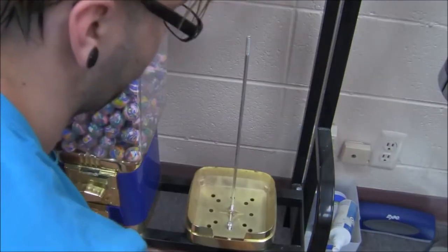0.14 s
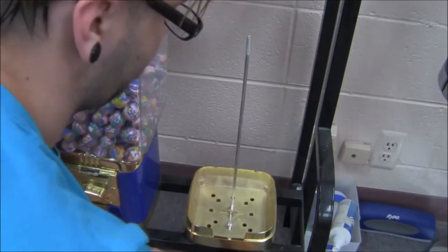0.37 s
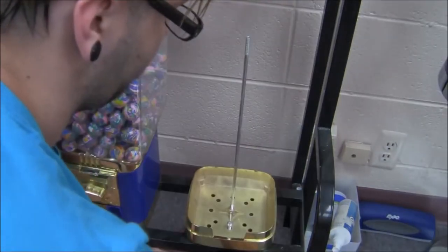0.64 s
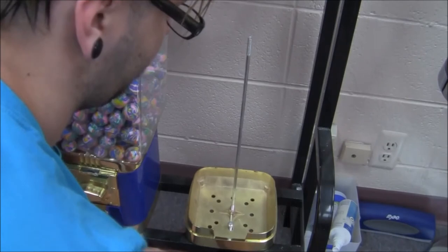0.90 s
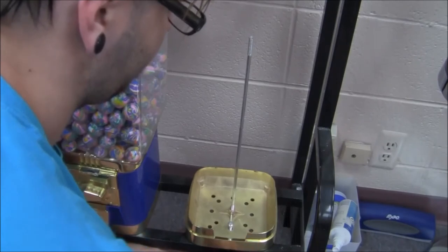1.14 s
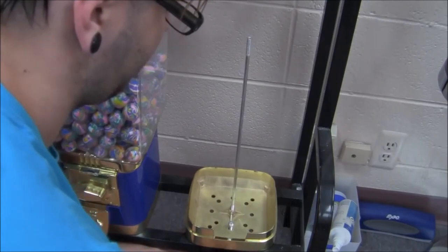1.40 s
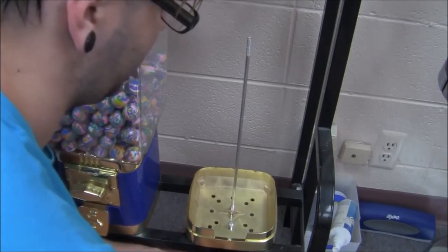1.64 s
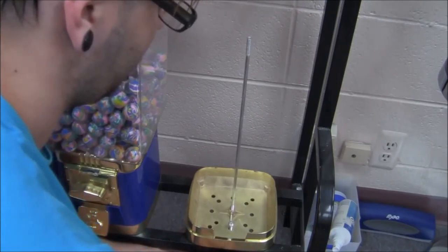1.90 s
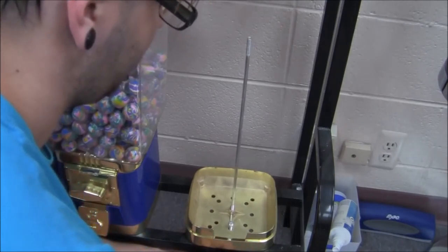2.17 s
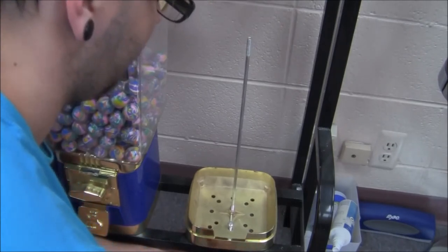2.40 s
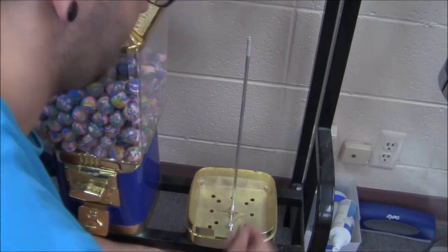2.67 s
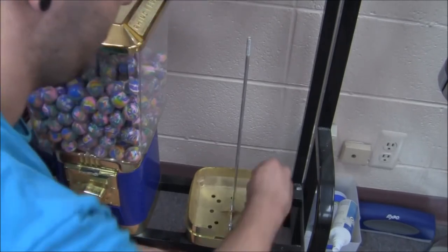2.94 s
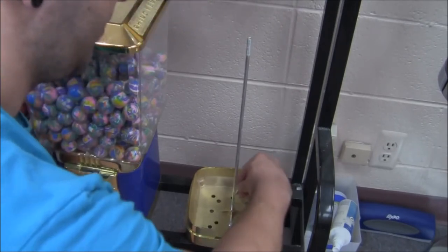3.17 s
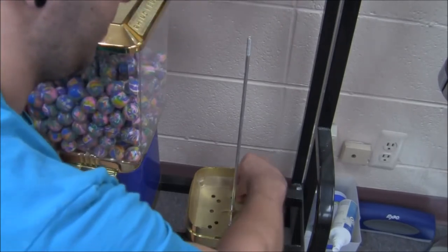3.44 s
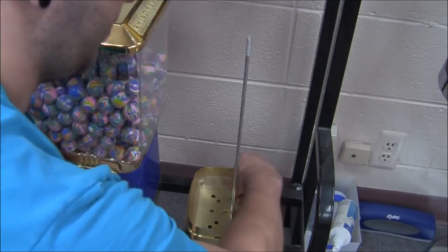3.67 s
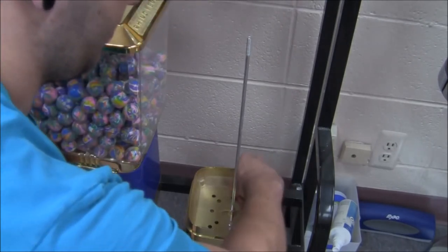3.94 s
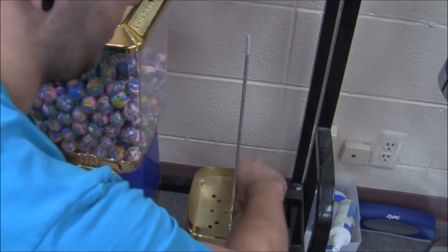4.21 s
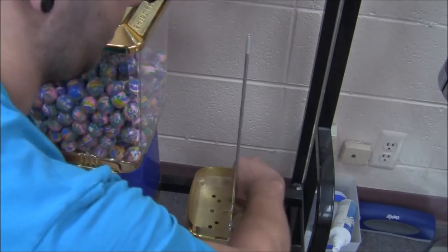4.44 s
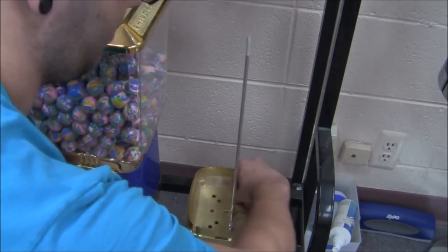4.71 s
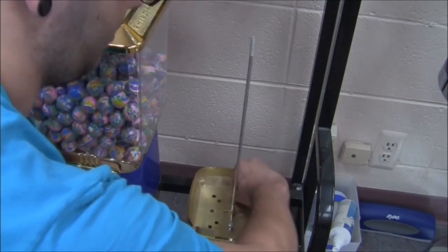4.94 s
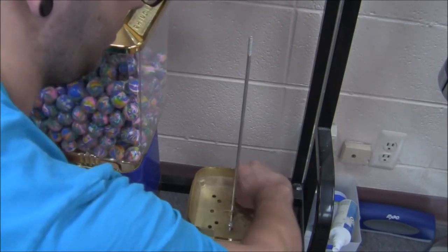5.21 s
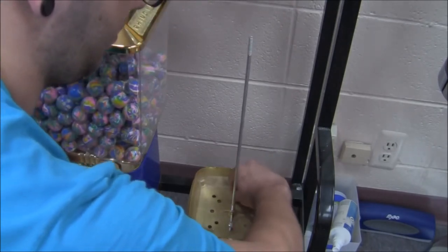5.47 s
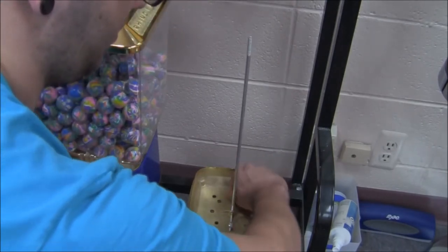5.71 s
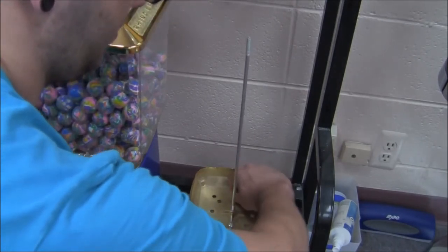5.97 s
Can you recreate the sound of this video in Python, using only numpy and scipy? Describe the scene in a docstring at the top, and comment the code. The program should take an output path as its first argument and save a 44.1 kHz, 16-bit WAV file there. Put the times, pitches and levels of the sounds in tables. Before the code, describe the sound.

Small steel parts are worked by hand in a metal casting on a shelf. First come several separate ringing clanks with low bumps, then about a second and a half of near quiet with one faint tap. After that, quick crisp clicks lead into smaller rattles, thuds and short gritty scrapes, thinning out at the end. The microphone is close, the indoor echo short and dry, with a faint throb in the background at times.

```python
"""Quiet room tone and a faint throb come first; then small steel bolts knock in a cast metal base on a shelf.
Place: a quiet room, its answer sparse echoes that die at a separate speed in each band.
Hands: bolts are dropped in and turned; chatter drives metal modes, fingers drag on the casting and thump the shelf.
Distance: the direct sound outweighs the room. Microphone: two channels, mostly leaning right, with treble loss."""
import sys
import numpy as np
from scipy import signal
from scipy.fft import rfft, irfft, next_fast_len
from scipy.io import wavfile
from scipy.ndimage import uniform_filter1d

SR = 44100
rng = np.random.default_rng(int(sys.argv[2]) if len(sys.argv) > 2 else 0)


def undo_db(level):
    """Turn decibels back into plain size, where 20 dB means ten times bigger."""
    steps = np.asarray(level, float) / 20
    return 10 ** steps


def store_pcm(level_fs):
    """Save levels as 16-bit WAV."""
    pcm = np.round(np.clip(level_fs, -1, 1) * 32767).astype(np.int16)
    wavfile.write(sys.argv[1], SR, np.atleast_2d(pcm).T)


N = 269010  # samples

# Room tone spectrum, relative: pitch_hz, level_db (per Hz)
AIR_SPECTRUM = [(12, -29.5), (20, -16.5), (197, -5), (220, -6.5), (344, -5), (395, -11.5), (552, -7.5),
                (600, -12.5), (730, -13), (964, -13), (1110, -15.5), (1390, -16.5), (1550, -19),
                (1730, -19.5), (15700, -38)]
AIR_DB = -59.5  # rms over both channels
# Left-right likeness of the room tone: pitch_hz, likeness (-1 to 1)
AIR_LIKENESS = [(60, 0.8353), (180, 0.4364), (550, -0.1591), (1650, -0.1335), (4970, 0.5009),
                (15000, -0.2045)]
# Spans in which the throb is heard: start_s, level_db (relative)
THROB_SPANS = [
    [(0.0, -64), (0.2, -68)],
    [(4.1, -65.5), (4.3, -71)],
    [(5.15, -71), (5.426, -84.5), (5.576, -72.5), (5.678, -66.5), (6.1, -65.5)],
]
THROB_HZ, THROB_WIDTH_HZ, THROBS_PER_S = 1686.4, 260, 21
# Decay of the room by band: pitch_hz, t60_s
ROOM_DECAY = [(300, 0.2244), (1000, 0.17483), (3000, 0.21902), (8000, 0.22027), (12000, 0.1087)]

# Fingers push the base: start_s, shelf_level_db, drag_db (against the shelf), thump_t60_s
PUSHES = [(0.158, -41.5, -3.5, 0.3515), (0.408, -46, -2.5, 0.2704), (0.561, -48, -15, 0.25),
          (.660, -37.5, -10, 0.3265), (0.72, -45.5, -6, 0.4924), (0.871, -46, -22, 0.4007),
          (1.057, -51, -11.5, 0.4294), (1.145, -52.5, -8, 0.4039), (1.377, -41, -2, 0.2396),
          (2.402, -57.5, -4.5, 0.3953), (2.73, -64, -5, 1.0637), (2.861, -54.5, -6.5, 0.325),
          (3.014, -60, 11, 0.0013), (3.391, -45, -5.5, 0.4846), (3.452, -45.5, -4, 0.4067),
          (3.642, -47, -6.5, 0.5847), (3.785, -58.5, -1, 0.5943), (3.926, -45, -12.5, 0.4348),
          (4.003, -44, -7, 0.2553), (4.05, -39, -9.5, 0.2526), (4.141, -56, -16, 0.452),
          (4.302, -53, -9, 0.5595), (4.365, -49, -7.5, 0.7778), (4.531, -45.5, -11.5, 0.2559),
          (4.699, -47, -8.5, 0.8277), (4.83, -46, -22, 0.2726), (4.97, -40.5, -8, 0.3352),
          (5.02, -48, -6.5, 0.3522), (5.119, -55, -3, 0.7877), (5.378, -56, 0, .5),
          (5.501, -43, -8.5, 0.2497), (5.62, -58.5, -5, 0.7747), (5.852, -63, -15.5, 0.126),
          (5.96, -62, -9.5, 0.3054), (6.07, -65.5, 1, 0.1)]
PUSH_RISE_S, PUSH_BEND = 0.003994, 1.2689  # the fade starts slowly and steepens
DRAG_LINGERS = 1.1042  # the drag lasts this many times the thump
JOLT_DB = 9  # first contact of a push, against one bump
# Resonances of the shelf: pitch_hz, width_hz, level_db
SHELF_BODY = [(173.88, 64.6, -15), (216.75, 52.76, -10), (289.64, 35.8, -5), (330.62, 23.426, -2),
              (368.52, 27.89, 0.5), (432.58, 21.504, -1.5), (489.24, 36.976, -2.5), (605.95, 70.48, -5.5),
              (696.23, 84.13, -9), (927.35, 197.6, -12.5)]
# Resonances of the casting under dragging fingers: pitch_hz, width_hz, level_db
DRAG_BODY = [(917.1, 201.4, -4.5), (1198.7, 160.72, 1), (1607.3, 198.1, -0.5), (1864.8, 226.9, -5),
             (2315.8, 85, -7.5), (3380, 4535, -17)]

# One part rings on alone: start_s, peak_db, pitch_hz, t60_s
PINGS = [(0.158, -35.5, 2829, 0.3736), (.159, -48, 4535, 0.3306), (.41, -58, 5522, 0.3329),
         (0.416, -47, 1716, 0.4888), (0.421, -42, 2840, 0.217), (.665, -39, 372.5, 0.3068),
         (.722, -38.5, 372.5, 0.3121), (1.149, -52.5, 1737, 0.2616), (1.38, -43, 4535, 0.2644),
         (1.38, -47, 3183, 0.6461), (2.87, -50, 1734, 0.4407), (3.4345, -23.5, 9830, 0.0468),
         (3.448, -39, 1740, 0.2673), (3.608, -25, 7033, 0.01358), (3.952, -48, 2861, 0.1389),
         (4.065, -42.5, 422.3, 0.2342), (4.305, -59.5, 8051, 0.2752), (4.31, -45.5, 3380, 0.11335),
         (5.40, -49.5, 1700, 0.247), (5.888, -53.5, 3198, 0.2643), (6.065, -62.5, 6430, 0.36)]
# Knocks at the source: start_s, peak_db (near 2 kHz),
# then against it low_db (around 1.1 kHz), mid_db (around 4 kHz), high_db (around 8 kHz)
KNOCKS = [(0.1587, -26, -1, 4.5, -7), (0.4072, -29, 2, -9, -16), (0.4134, -42.5, 4.5, -8.5, -31),
          (0.5596, -47.5, -27, -11, -25.5), (0.6581, -24, -16, -17.5, -25.5),
          (0.6633, -24.5, -18.5, -8.5, -27.5), (0.7171, -27, 0.5, -7, -15), (0.771, -54.5, -7, -23, -30),
          (0.8679, -55, -8.5, -51, -41), (1.1424, -39.5, -4, -16, -19), (1.1514, -47.5, 9.5, -23, -5),
          (1.3792, -17.5, -9, -0.5, -15), (2.4034, -54.5, 6.5, -1.5, -2), (2.863, -45, 3.5, -29.5, -36.5),
          (3.385, -27, -23.5, -3.5, -15.5), (3.4168, -33, -28, 1, -3.5), (3.4373, -19, -38.5, 0, -4.5),
          (3.4468, -21, -23, 6, -0.5), (3.5949, -37, -29, -5, -9), (3.6074, -42.5, -7.5, -0.5, 2.5),
          (3.6564, -40, -12, -10, -15.5), (3.706, -44, -13.5, -7.5, -28.5), (3.7816, -36, -10.5, 6.5, 9.5),
          (3.921, -46.5, -19.5, -4.5, -5), (3.9513, -41, -5.5, -9, -18.5), (3.9977, -47, -5, -10.5, -9.5),
          (4.0527, -39, -1, -12, -15), (4.3032, -34, -7, 0, -10.5), (4.3773, -36.5, -25.5, -5.5, -18.5),
          (4.4109, -46.5, -26, -20, -19.5), (4.6936, -46, -6, -10.5, -9.5), (4.7166, -33, -10.5, 1, -7),
          (4.7644, -32.5, -9, -9.5, -33), (4.9701, -41.5, -32.5, -3, -21.5), (4.9978, -39, -19, -5, -9),
          (5.3931, -42, -9.5, -5.5, -15), (5.5059, -50, 10.5, -4, -8.5), (5.887, -42.5, -12, -8, -3)]
# Short casting resonances: pitch_hz, width_hz, level_db
CLACK_BODY = [(1160, 160, 2), (1550, 200, -11), (1950, 100, 2), (2150, 90, 1), (2600, 200, -4),
              (2820, 200, -4), (3200, 120, -9), (3620, 150, -8), (4180, 120, -5), (4550, 220, -2),
              (5050, 250, -7), (6430, 350, -8), (7200, 300, -11), (7980, 250, -11), (8900, 400, -16),
              (9850, 350, -9), (10400, 300, -13)]
# Long modes of the free casting: pitch_hz, level_db, t60_s
FREE_MODES = [(1061, -8, 0.26), (1227, -11, 0.27), (1378, -3, 0.13), (1733, -11, 0.24), (1949, -15, 0.26),
              (2116, -12, 0.25), (2460, -19, 0.26), (2740, -11, 0.27), (2837, -1, 0.27), (3182, -2, 0.23),
              (3650, -14, 0.26), (3892, 0, 0.14), (4156, -10, 0.18), (4398, -9, 0.17), (4533, -7, 0.23),
              (4834, -13, 0.24), (5055, -21, 0.29), (6352, -16, 0.13), (6595, -33, 0.37), (7300, -15, 0.13),
              (7720, -31, 0.31), (8027, -29, 0.25), (9733, -23, 0.13), (9921, -15, 0.092)]
# Modes of bolt and casting under the hand: pitch_hz, level_db, t60_s
HELD_MODES = [(1733, -16, .25), (1879, -13, .15), (2159, -8, .1), (2630, -14, .1), (2837, -11, .14),
              (3203, -17, .2), (3451, -20, .2), (3903, -23, .2), (4172, -9, .13), (4452, -17, .14),
              (4764, -14, .088), (4947, -5, .053), (5238, -15, .16), (5367, -17, .2), (6078, -18, .18),
              (6438, -4, .054), (7138, -20, .15), (7590, -17, .11), (7962, -15, .1), (8199, -28, .2),
              (8527, -26, .2), (8791, -25, .14), (9250, -22, .12), (9512, -25, .12), (9959, -14, .075),
              (10150, -15, .1), (10560, -20, .12), (11530, -36, .15)]
HAND_ON_S = 3.2  # from here a hand rests in the base
FREE_RING_DB, HELD_RING_DB = -12.5, -13  # long modes against the clack, before the spot's favour
# Many weak modes between the listed ones, as a dying hiss; level before the treble is softened
RATTLE_DB, RATTLE_T60_S = -15.5, 0.1588

# A bolt slides on the casting: start_s, peak_db (at the source), mid_db (around 4 kHz), stroke_s
SCRAPES = [(3.941, -49.5, 13, 0.02383), (4.048, -53.5, -10.5, 0.0923), (4.5, -48.5, -10, 0.03821),
           (4.541, -44, -12, 0.02799), (4.9445, -54, -9, 0.02346), (4.98, -47.5, -6.5, 0.01272),
           (5.106, -51, -19, 0.01375), (5.666, -54.5, -11.5, 0.03888), (5.907, -43, -12.5, 0.016786),
           (6.056, -48.5, -12.5, 0.04027)]

# Lean of the work between the channels: pitch_hz, left_minus_right_db
LEAN = [(150, 2), (350, -4.5), (700, -4.5), (1500, -2), (5000, -2), (10000, 0.5)]
# Treble loss on the way to the microphone: pitch_hz, level_db
MIC_LOSS = [(9500, -1.5), (10600, -3.5), (11500, -7), (13500, -16), (16000, -83.5)]


def evened(x):
    """Scales to rms 1."""
    return x / np.sqrt(np.mean(x ** 2) + 1e-20)


def read(points, hz):
    """Reads a table along log frequency."""
    f, value = np.transpose(points)
    return np.interp(np.log(hz + 1), np.log(f + 1), value)


def add(mix, s, sound):
    """Mixes a sound in at a time."""
    part = mix[round(s * SR):][:len(sound)]
    part += sound[:len(part)]


def body(peaks, hz, spot_db=0):
    """Frequency response of parallel resonances; spot_db is how well the struck spot drives each."""
    f, width, db = np.transpose(peaks)[:, :, None]
    sign = (-1.) ** np.arange(len(f))[:, None]
    damping = 1j * hz * width
    return (sign * undo_db(db + spot_db) * damping / (f ** 2 - hz ** 2 + damping)).sum(axis=0)


def through(x, peaks):
    """Filters a long signal by a body."""
    size = next_fast_len(N + SR)
    return irfft(rfft(x, size) * body(peaks, np.fft.rfftfreq(size, 1 / SR)), size)[:N]


def air():
    """Room tone and microphone hiss as random short-time spectra, with slow patches of level."""
    frames, hz = N // 512 + 5, np.fft.rfftfreq(2048, 1 / SR)
    a, b, c, d, patches = rng.standard_normal((frames, 1025, 5)).T
    patches = evened(uniform_filter1d(uniform_filter1d(patches, 20, 0), 8, 1))
    likeness = np.clip(read(AIR_LIKENESS, hz), -1, 1)[:, None]
    left = a + 1j * b
    right = likeness * left + np.sqrt(1 - likeness ** 2) * (c + 1j * d)
    spectra = np.array([left, right]) * undo_db(read(AIR_SPECTRUM, hz)[:, None] + 0.6298 * patches)
    return undo_db(AIR_DB) * evened(signal.istft(spectra, nperseg=2048, noverlap=1536)[1][:, :N])


def throb_gain():
    """Gain of the throb along time, silent between its spans."""
    t, gain = np.arange(N) / SR, np.zeros(N)
    for span in THROB_SPANS:
        start_s, level_db = np.transpose(span)
        gain += undo_db(np.interp(t, start_s, level_db, left=-200, right=-200))
    return uniform_filter1d(gain, 800)


def throb():
    """Regular puffs of noise pass twice through one narrow resonance."""
    turns = np.arange(N) * THROBS_PER_S / SR + 0.2298
    puffs = rng.standard_normal(N) * np.exp(5.74 * np.cos(2 * np.pi * turns))
    narrow = [(THROB_HZ, THROB_WIDTH_HZ, 0)]
    return evened(through(through(puffs, narrow), narrow)) * throb_gain() * undo_db(-2.5)


def room(x):
    """Sparse taps of random sign, each band dying at its own speed, other taps for each side."""
    taps = np.zeros((2, SR // 2))
    at = np.arange(160, SR // 2 - 20, 20) + rng.integers(0, 20, (2, (SR // 2 - 161) // 20))
    np.put_along_axis(taps, at, rng.choice([-1., 1.], at.shape), 1)
    taps = taps + 0.5437 * taps[::-1]  # each side hears some of the other
    hz, t, spectra = signal.stft(taps, SR, nperseg=256)
    fade = undo_db(-60 * t / read(ROOM_DECAY, hz)[:, None])
    tail = signal.istft(spectra * fade, SR, nperseg=256)[1]
    return signal.fftconvolve(x[None], tail / np.linalg.norm(tail[0]), axes=1)[:, :N]


def pushing(drags):
    """Gain along time of all pushes: a quick rise, then a fade that steepens."""
    power, t = np.zeros(N), np.arange(SR) / SR
    rise = 1 - np.exp(-t / PUSH_RISE_S)
    for s, db, drag_db, t60 in PUSHES:
        length = t60 * (DRAG_LINGERS if drags else 1)
        fade_db = -60 * (t / length) ** PUSH_BEND
        add(power, s, (undo_db(db + drags * drag_db + fade_db) * rise) ** 2)
    return np.sqrt(power)


def sparse_hits(per_s, spread_db):
    """Random single-sample contacts of widely varied strength."""
    hits = (rng.random(N) < per_s / SR) * rng.standard_normal(N)
    return hits * undo_db(spread_db * rng.exponential(1, N))


def handling():
    """A jolt, then soft bumps and slips of the fingers shake the shelf and drag on the casting."""
    bumps, slips = sparse_hits(900, 1.8), sparse_hits(6000, 1.217)
    jolts = np.zeros(N)
    for s, db, *_ in PUSHES:
        add(jolts, s, undo_db(db + JOLT_DB) * np.ones(1))
    soft = signal.butter(4, 1100, fs=SR, output="sos")  # skin is soft: little treble
    slips = signal.sosfilt(signal.butter(2, 4000, fs=SR, output="sos"), slips)
    shelf = through(signal.sosfilt(soft, bumps * pushing(False) + jolts), SHELF_BODY)
    shelf = shelf / through(signal.sosfilt(soft, bumps), SHELF_BODY).std()
    drag = evened(through(slips, DRAG_BODY)) * pushing(True)
    return shelf + drag


def pings():
    """Single parts ring on alone as dying sines."""
    out, t = np.zeros(N), np.arange(SR // 3) / SR
    rise = 1 - np.exp(-t / 0.001561)
    for s, db, hz, t60 in PINGS:
        add(out, s, undo_db(db - 60 * t / t60) * np.sin(2 * np.pi * hz * t) * rise)
    return out


def struck(modes, t):
    """One row of dying sine for each mode, the sum peaking at 1."""
    f, db, t60 = np.transpose(modes)[:, :, None]
    tones = undo_db(db - 60 * t / t60) * np.sin(2 * np.pi * f * t) * (1 - np.exp(-t / 0.002408))
    return tones / abs(tones.sum(axis=0)).max()


def knocks():
    """A few ms of contact chatter drive the short resonances; the blow starts the long modes."""
    out, t, hz = np.zeros(N), np.arange(16384) / SR, np.fft.rfftfreq(16384, 1 / SR)
    free, held = struck(FREE_MODES, t), struck(HELD_MODES, t)
    for s, db, low_db, mid_db, high_db in KNOCKS:
        chatter = rng.standard_normal(len(t)) * t * np.exp(-t / 0.0021128)
        clack_spot_db = 2.5 * rng.standard_normal((len(CLACK_BODY), 1))
        clack = irfft(rfft(chatter) * body(CLACK_BODY, hz, clack_spot_db))
        rattle = rng.standard_normal(len(t)) * undo_db(RATTLE_DB - 60 * t / RATTLE_T60_S)
        rattle *= 1 - np.exp(-t / 0.001233)
        rattle = signal.lfilter([.4], [1, -.6], rattle)  # weaker towards the treble
        if s > HAND_ON_S:
            modes, ring_db, spread_db = held, HELD_RING_DB, 4
        else:
            modes, ring_db, spread_db = free, FREE_RING_DB, 1.5
        spot = undo_db(spread_db * rng.standard_normal(len(modes)))  # the struck spot favours some modes
        ring = undo_db(ring_db) * spot @ modes
        spectrum = rfft(clack / abs(clack).max() + rattle + ring)
        bands = [(800, 1450, low_db), (1450, 2550, 0), (2550, 5700, mid_db), (5700, SR, high_db)]
        for lo_hz, hi_hz, rel_db in bands:
            edge = 1 / (1 + (hz / hi_hz) ** 12) - 1 / (1 + (hz / lo_hz) ** 12)
            band = np.roll(irfft(spectrum * edge), 100)  # room for the filter's swing ahead of the onset
            add(out, s - 100 / SR, undo_db(db + rel_db) * band / abs(band).max())
    return out


def scrapes():
    """Dense micro-slips under a short stroke drive the modes of the seated bolt."""
    out = np.zeros(N)
    hz = np.fft.rfftfreq(8192, 1 / SR)
    rubbed = [(f, 10.56 / t60, 0) for f, _, t60 in HELD_MODES]  # rubbing widens every mode
    for s, db, mid_db, length in SCRAPES:
        u = np.arange(8192) / SR / max(length, .005)
        stroke = u ** .5 * np.exp(-u ** 2)
        slips = rng.standard_normal(len(u)) * undo_db(3.2415 * rng.exponential(1, len(u))) * stroke
        tilt = undo_db(read([(1200, -9.5), (2600, mid_db), (5500, mid_db), (6000, -13)], hz))
        spot_db = 3 * rng.standard_normal((len(rubbed), 1))
        response = body(rubbed, hz, spot_db) + 0.0909  # some of the slips is heard directly
        sound = irfft(rfft(slips) * response * tilt)
        add(out, s, undo_db(db) * sound / abs(sound).max())
    return out


def scene():
    """The work sits a little to one side of the microphone; the room answers it."""
    metal = knocks() + pings() + scrapes()
    hands = handling() + throb()
    wet = undo_db(-7.5) * room(metal) + undo_db(-6.5) * room(hands)
    hz = np.fft.rfftfreq(N, 1 / SR)
    path_db = read(LEAN, hz) * np.array([[.5], [-.5]]) + read(MIC_LOSS, hz)
    return irfft(rfft(metal + hands + wet) * undo_db(path_db), N) + air()


def roll_off(x):
    """The treble ends steeply here."""
    return signal.sosfilt(signal.butter(12, 15820, fs=SR, output="sos"), x)


def record(dry):
    return roll_off(dry)


dry = scene()
out = record(dry)
store_pcm(out)
```